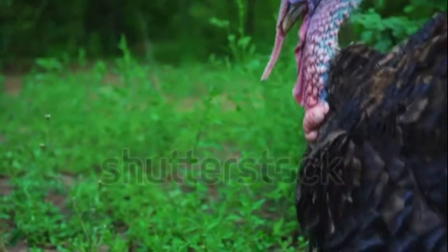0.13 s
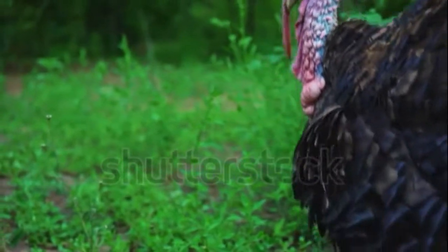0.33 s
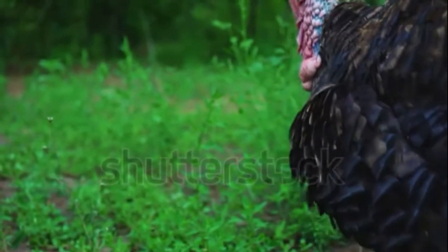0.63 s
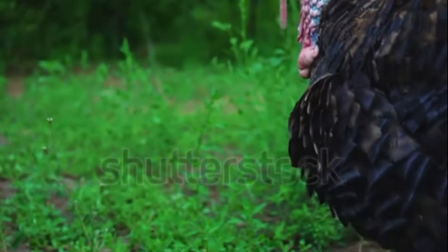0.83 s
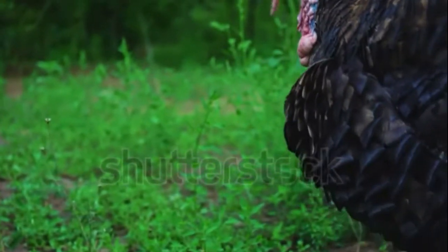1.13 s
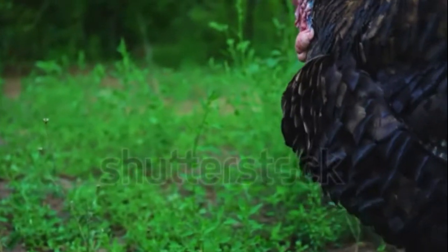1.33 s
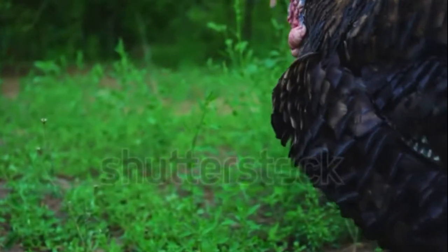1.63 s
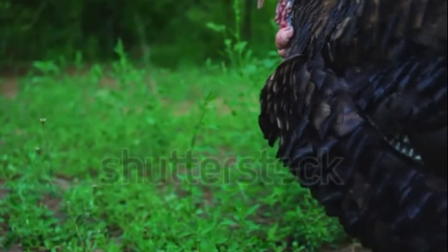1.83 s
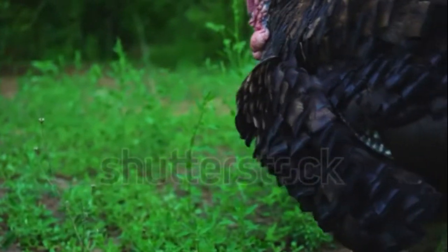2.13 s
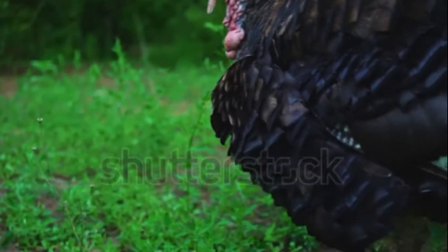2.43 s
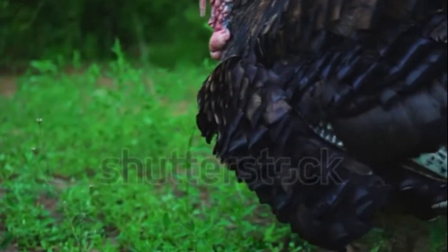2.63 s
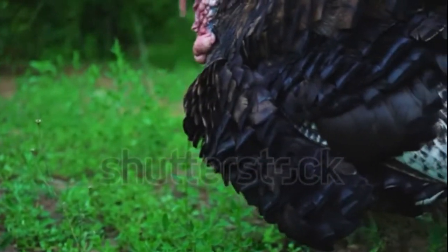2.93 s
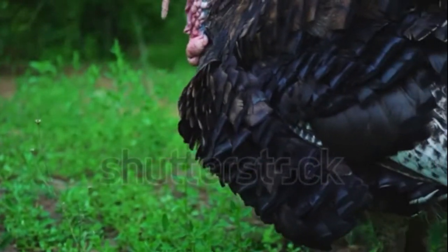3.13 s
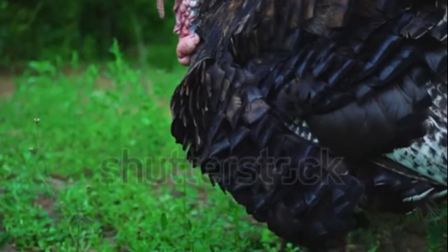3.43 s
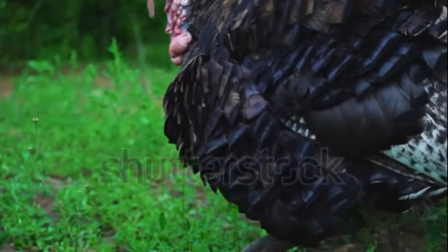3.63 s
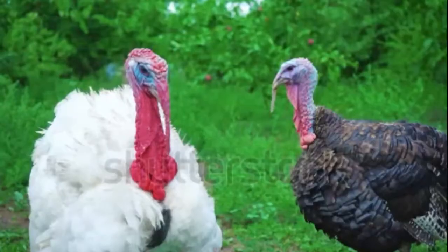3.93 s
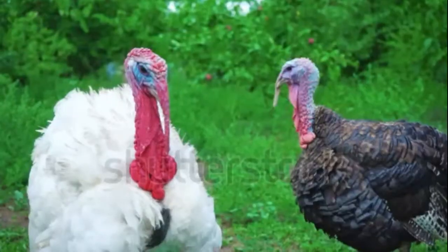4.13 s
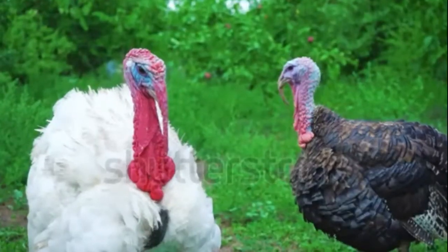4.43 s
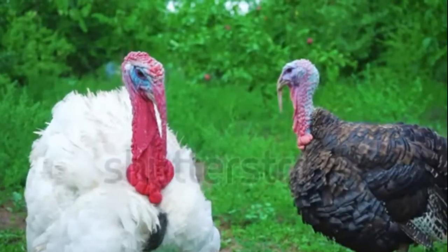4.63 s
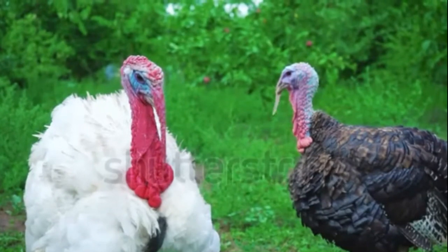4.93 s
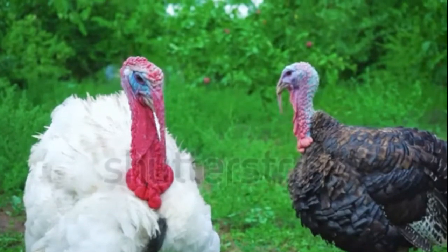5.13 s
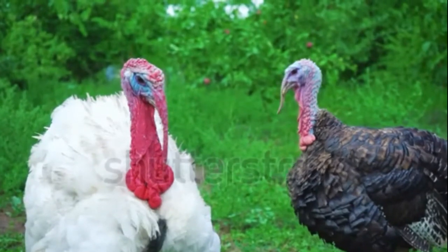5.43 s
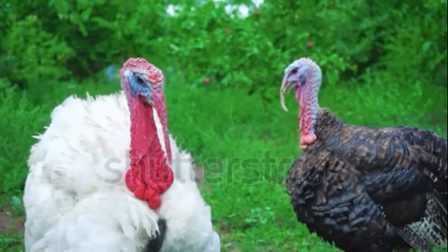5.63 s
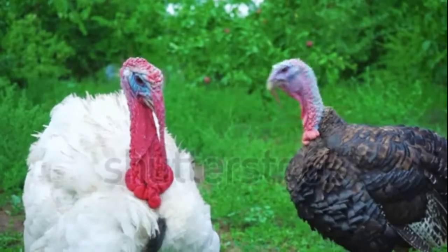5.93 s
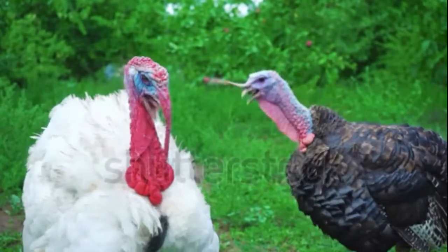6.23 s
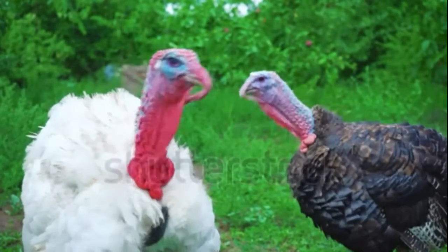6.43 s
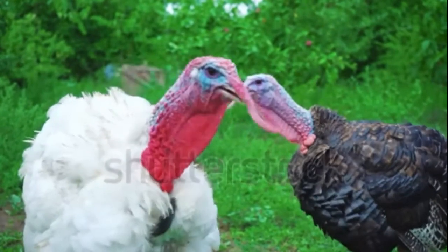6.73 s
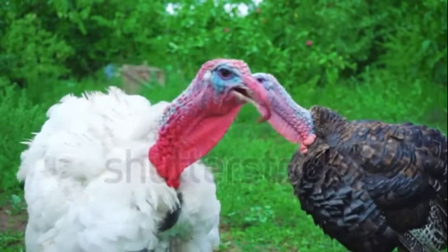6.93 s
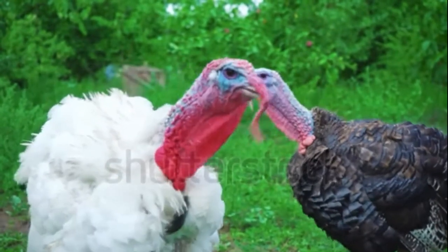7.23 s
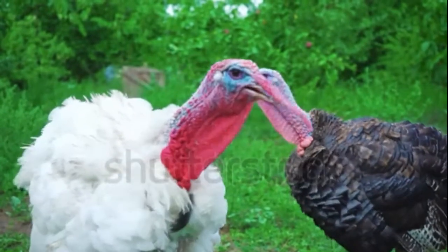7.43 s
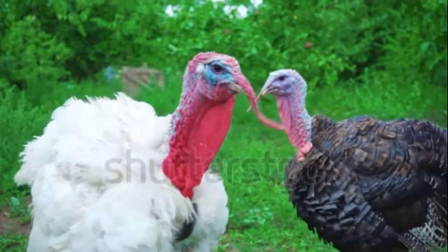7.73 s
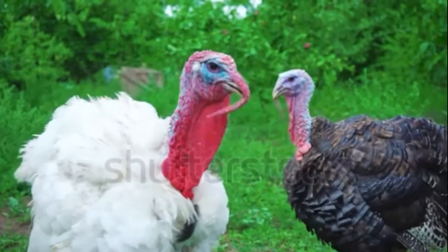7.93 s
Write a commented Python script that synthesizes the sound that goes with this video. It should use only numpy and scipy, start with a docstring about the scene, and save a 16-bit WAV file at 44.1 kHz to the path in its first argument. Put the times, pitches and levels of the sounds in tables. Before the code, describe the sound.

A few turkeys call close to a stereo microphone on a lawn. Hoarse squawks run into a quick string of yelps, then a bubbling gobble. Mixed chatter and wavering cries fill the middle, another gobble follows, then voices that crack upward, and two more gobbles near the end. Quiet clucks, occasional low chest drumming, soft air rumble and a very faint echo from trees lie underneath.

```python
"""On a lawn, a few turkeys call over one another close to a stereo microphone: gobbles, yelps, hoarse squawks
and low chatter over soft rumble, a deep chest drumming now and then, and a faint echo from trees.
Voices are harmonic stacks roughened by noise; a gobble is a held note, then pulses with whistles between.
Drumming is a wavering sine, the air is shaped noise, and the echo is decaying noise taps."""
import sys
import numpy as np
from scipy import signal
from scipy.io import wavfile
from scipy.ndimage import uniform_filter1d

SR = 44100
rng = np.random.default_rng(int(sys.argv[2]) if len(sys.argv) > 2 else 0)


def master_out(mix):
    """Clip the mix to full scale and print it as 16-bit PCM to the path in sys.argv[1]."""
    frames = np.transpose(np.atleast_2d(mix))
    ceiling = np.clip(frames, -1, 1)
    pcm = np.round(ceiling * 32767).astype(np.int16)
    wavfile.write(sys.argv[1], SR, pcm)


N = 356107


def amp(db):
    """Amplitude ratio of a level in dB."""
    return 10 ** (np.asarray(db) / 20)


def evened(x):
    """Scales each row to rms 1."""
    return x / np.sqrt(np.mean(abs(x) ** 2, -1, keepdims=True) + 1e-20)


def add(mix, start_s, sound):
    """Adds a stereo sound into the mix at its start time."""
    part = mix[:, max(round(start_s * SR), 0):][:, :sound.shape[1]]
    part += sound[:, :part.shape[1]]


def wander(count, size):
    """Smooth random drift of rms 1 that turns every `size` samples or so."""
    x = rng.standard_normal(count + 4 * size)
    smooth = uniform_filter1d(uniform_filter1d(x, size=size), size=size)
    return evened(smooth)[2 * size:2 * size + count]


# spectrum of the air noise: freq_hz, relative_db_per_hz
AIR_SPECTRUM = [(25, -15), (124, -11), (330, -17), (600, -23.5), (3000, -38), (11000, -40.5)]
AIR_DB = -51


def air():
    """Soft rumble and hiss: shaped noise in drifting patches, mostly unlike at the two ports."""
    frames, bin_hz = N // 256 + 5, np.fft.rfftfreq(1024, 1 / SR)
    a, b, c, d, patches = rng.standard_normal((frames, 513, 5)).T
    patches = uniform_filter1d(patches, size=6, axis=0)
    patches = evened(uniform_filter1d(patches, size=20, axis=1))
    shared, separate = a + 1j * b, c + 1j * d
    ports = np.array([shared, 0.38 * shared + 0.96 * separate])
    freq_hz, density_db = np.transpose(AIR_SPECTRUM)
    spectrum_db = np.interp(np.log(bin_hz + 1), np.log(freq_hz + 1), density_db)
    ports = ports * amp(spectrum_db[:, None] + 3 * patches)
    noise = signal.istft(ports, nperseg=1024, noverlap=768)[1][:, :N]
    return amp(AIR_DB) * evened(noise)


NEAR_DECAY_S, NEAR_DB = 0.066, -8  # time to fall 60 dB
FAR_DECAY_S, FAR_RISE_S, FAR_DB = 6.5, 0.066, -48  # tail is cut at 1 s


def space(x):
    """Ground and bodies give short reflections, unlike at each port; far trees a long, dull, faint tail."""
    t = np.arange(SR) / SR
    taps = rng.standard_normal((2, 2, SR))
    near = taps[0] * amp(-60 * t / NEAR_DECAY_S) * (t > .0004)
    far = uniform_filter1d(taps[1], size=8) * amp(-60 * t / FAR_DECAY_S) * np.clip(t / FAR_RISE_S, 0, 1)
    near *= amp(NEAR_DB) / np.linalg.norm(near[0])
    far *= amp(FAR_DB) / np.linalg.norm(far[0])
    return signal.fftconvolve(x.mean(0)[None], near + far, axes=1)[:, :N]


# chest drumming, one list a bout: time_s, level_db
DRUM_BOUTS = [
    [(1.1, -49.5), (1.75, -58.5)],
    [(2.7, -57), (3.48, -47), (3.9, -57)],
    [(5.63, -37.5), (5.77, -39)],
    [(6.8, -52), (7.1, -66)],
    [(7.75, -46), (8.07, -59)],
]
DRUM_HZ, DRUM_WAVER = 72.5, .06  # waver: rms share of pitch


def drumming():
    """Chest drumming: a low sine, wavering in pitch and level."""
    t = np.arange(N) / SR
    level = sum(amp(np.interp(t, *np.transpose(rows), -120, -120)) for rows in DRUM_BOUTS)
    level = uniform_filter1d(level, size=600) * amp(4 * wander(count=N, size=1800))
    turns = np.cumsum(DRUM_HZ * (1 + DRUM_WAVER * wander(count=N, size=2000))) / SR
    return np.sqrt(2) * level * np.sin(2 * np.pi * turns)


# bouts of farther clucks: start_s, end_s
FLOCK_BOUTS = [(1.15, 1.62), (2.9, 3.85), (7.3, 8.05)]
# farther voice: pan_db (left-right), hoarseness_0_1, second_db, third_db, upper_db (harmonics as VOICES)
FLOCK_VOICE = (-7, .16, 0, -10, -32)
FLOCK_DB, FLOCK_STEP_S = -46, .05  # quietest cluck


def flock():
    """Farther birds: short arched clucks, about one a step, with random timing, pitch and strength."""
    mix = np.zeros((2, N))
    for start, end in FLOCK_BOUTS:
        starts = np.arange(start, end, FLOCK_STEP_S)
        for s, (late, high, arch, loud) in zip(starts, rng.random((len(starts), 4))):
            t = np.arange(s, s + .04, 1 / SR) + late * FLOCK_STEP_S
            hump = np.sin(np.linspace(0, np.pi, len(t)))
            hz = 550 * 2 ** high * (1 + .3 * (arch - .5) * hump)
            add(mix, t[0], sing(t, amp(FLOCK_DB + 10 * loud) * hump, hz, FLOCK_VOICE))
    return mix


# throat shaking: first_crest_s, end_s, rate_hz, first_swing, last_swing (shares of pitch)
WARBLES = [(2.526, 2.768, 41, 0.046, 0.031), (4.729, 4.966, 42, 0.074, 0.024),
           (5.843, 6.05, 33, 0.05, 0.043)]


def shaking(t):
    """Throat shake as a relative pitch swing; zero outside the warbles."""
    swing = 0
    for start, end, rate_hz, first, last in WARBLES:
        depth = np.interp(t, [start - .02, start, end, end + 0.0099], [0, first, last, 0])
        swing = swing + depth * np.cos(2 * np.pi * rate_hz * (t - start))
    return swing


# every second cycle weakens: start_s, full_s, end_s, depth_0_1
DOUBLING = [(4.99, 5.03, 5.09, .92), (5.975, 6.0, 6.06, .6), (6.08, 6.09, 6.117, .7),
            (6.29, 6.3, 6.37, .06), (7.08, 7.09, 7.16, .05)]


def doubling(t):
    """Depth by which alternate vocal cycles differ in strength."""
    return sum(np.interp(t, [start, full, end, end + .001], [0, depth, depth, 0])
               for start, full, end, depth in DOUBLING)


# windpipe and beak favour some overtones: freq_hz, gain_db
RING = [(900, 0), (2000, 4), (2600, -3), (3250, 5), (3850, 2), (4600, 5), (5300, -9), (6100, -4),
        (7200, -1), (8200, -7), (9200, 1), (11000, -6)]


def sing(t, level, hz, voice, fade_s=0.0023):
    """Harmonic stack; hoarseness unsettles the pitch and swaps each harmonic for a noise band around it."""
    pan_db, hoarse, second_db, third_db, upper_db = voice
    shake = shaking(t)
    quaver = (.006 + .1 * min(hoarse, .4)) * wander(count=len(t), size=250)
    jitter = .22 * hoarse * wander(count=len(t), size=24)
    k = np.arange(1, 17)[:, None]
    steady_hz = hz * (1 + shake + quaver)

    # upper_db holds at 4 kHz, with a tilt per kHz
    shares_db = upper_db - 2.09 * (k * steady_hz / 1000 - 4.0)
    shares_db[:3] = [[0], [second_db], [third_db]]
    shares_db += np.interp(k * steady_hz, *np.transpose(RING))
    # softer singing is duller; overtones fade as a glide lifts them past the throat's ring
    softer_db = np.clip(20 * np.log10(level / level.max() + 1e-9), -20, 0)
    shares_db += np.sqrt(k - 1) * 0.16 * softer_db
    shares_db -= 2.3 * (k - 1) * (hz - hz.mean()) / 1000
    patchy = wander(count=len(k) * len(t), size=400).reshape(len(k), len(t))
    shares_db += 1.09 * np.minimum(k - 1, 5) * patchy
    shares = amp(shares_db) * (k * hz < SR / 3)

    # upper harmonics are always a little breathy
    rough = np.clip(hoarse + .011 * k * (k - 1), 0, 1)
    noise = rng.standard_normal((2, len(k), len(t)))
    a, b = uniform_filter1d(uniform_filter1d(noise, size=36), size=36)
    breath = evened(a + 1j * b)
    turns = np.cumsum(steady_hz * (1 + jitter)) / SR
    carrier = np.exp(1j * k * (2 * np.pi * turns + np.pi / 4))
    stack = shares * (np.sqrt(1 - rough ** 2) + rough * breath) * carrier
    wave = np.sqrt(2) * stack.real.sum(0) / np.sqrt((shares ** 2).sum(0))
    wave = wave * (1 + doubling(t) * np.cos(np.pi * turns))

    edges = np.sin(np.pi / 2 * np.clip(np.minimum(t - t[0], t[-1] - t) / fade_s, 0, 1)) ** 2
    thinning = amp(-40 * shake)  # quieter at the top of each shake
    return wave * edges * level * thinning * amp([[pan_db / 2], [-pan_db / 2]])


def phrase(rows, voice, size=180):
    """Sings along rows of time_s, level_db, pitch_hz; corners rounded over `size` samples."""
    s, level_db, hz = np.transpose(rows)
    t = np.arange(s[0], s[-1], 1 / SR)
    tracks = [np.interp(t, s, amp(level_db / 2)) ** 2, np.interp(t, s, hz)]
    level, hz = uniform_filter1d(tracks, size=size, mode="nearest")
    return s[0], sing(t, level, hz, voice)


# voice kinds, harmonics re the 1st before RING and drift: second_db, third_db, upper_db (at 4 kHz)
VOICES = {"yelp": (-21, -19, -30), "pipe": (-36, -45, -48), "clear": (1.5, -21, -30.5),
          "full": (2.9, -8.5, -27.5), "cluck": (2.2, -4, -25.5), "chatter": (0.84, -22, -29.5),
          "nasal": (18, 16, -10), "rasp": (5.34, -3, -15.5), "squawk": (13.6, 0.75, 0),
          "thin": (-22, -22, -31.5), "hiss": (-1.5, -10, 5.2), "honk": (14, 5.9, -25),
          "bright": (1, -16.5, -22), "plain": (-8.5, -22, -36)}
# hoarseness_0_1 of each kind
HOARSE = {"yelp": .02, "pipe": .04, "clear": .03, "full": .06, "cluck": .12, "chatter": .13, "nasal": .25,
          "rasp": .27, "squawk": .36, "thin": .3, "hiss": 1, "honk": .07, "bright": .04, "plain": .07}
RISE_DB, RELEASE_S, RELEASE_DB = -20, .003, -9


def note(start, length, attack, level_db, change_db, first_hz, middle_hz, last_hz, pan_db, voice):
    """Attack, sloping hold and release; the pitch bends smoothly through three values."""
    s = np.arange(0, length, .002)
    hold = max(length - RELEASE_S, attack + .001)
    shape_db = [RISE_DB, 0, change_db, change_db + RELEASE_DB]
    # straight in square-root amplitude
    shape = np.interp(s, [0, attack, hold, hold + RELEASE_S], amp(np.divide(shape_db, 2)))
    bend = np.polyfit([0, .5, 1], [first_hz, middle_hz, last_hz], deg=2)
    hz = np.polyval(bend, s / length)
    rows = np.transpose([start + s, level_db + 40 * np.log10(shape), hz])
    return phrase(rows, (pan_db, HOARSE[voice], *VOICES[voice]))


# single notes: start_s, length_s, attack_s, level_db, hold_change_db, first_hz, middle_hz, last_hz,
# pan_db (left-right), voice
NOTES = [ (0, 0.026, 0.0018, -21.5, -9.5, 2204, 1150, 597, 6.5, "thin"),
         (0.079, 0.073, 0.026, -22.5, -3, 937, 891, 946, -1.5, "cluck"),
         (0.109, 0.074, 0.0043, -17, 0.5, 948, 1011, 1080, -4, "squawk"),
         (0.171, 0.03, 0.016, -16.5, -6.5, 1095, 1743, 2600, -3.5, "thin"),
         (0.193, 0.035, 0.0052, -27, -10.5, 2550, 2190, 840, -3.5, "pipe"),
         (0.257, 0.058, 0.028, -13, -10, 838, 848, 764, 2, "clear"),
         (0.373, 0.041, 0.025, -27.5, 5, 864, 888, 840, 2.5, "full"),
         (0.387, 0.12, 0.012, -15, -4.5, 922, 1024, 985, -5, "squawk"),
         (0.48, 0.08, 0.028, -8.5, -5.5, 724, 789, 828, 4.5, "pipe"),
         (0.548, 0.05, 0.0027, -16, 3.5, 913, 800, 1060, -1, "yelp"),
         (0.621, 0.0334, 0.0079, -15, 0.5, 855, 956, 1104, 1.5, "yelp"),
         (0.671, 0.032, 0.016, -12, 0, 940, 956, 1110, 4.5, "yelp"),
         (0.724, 0.026, 0.0057, -11, 1, 947, 979, 1096, -1.5, "yelp"),
         (0.765, 0.038, 0.0092, -7.5, -8.5, 932, 1033, 1110, 4, "yelp"),
         (0.797, 0.042, 0.021, -8, -4, 997, 1009, 1115, 2, "yelp"),
         (0.837, 0.057, 0.0069, -11, 0.5, 1054, 993, 1045, 4, "yelp"),
         (0.909, 0.014, 0.006, -12, -14, 1035, 780, 631, -2, "pipe"),
         (1.089, 0.037, 0.022, -29, -18, 872, 960, 930, -5.5, "rasp"),
         (1.161, 0.021, 0.0075, -30.5, -21, 934, 880, 820, -1, "cluck"),
         (1.278, 0.046, 0.035, -17, 5, 534, 580, 676, -5, "honk"),
         (1.317, 0.064, 0.022, -14.5, -15.5, 589, 620, 713, -6.5, "honk"),
         (1.364, 0.043, 0.0051, -25, -9.5, 730, 600.6, 520, -3.5, "pipe"),
         (1.503, 0.12, 0.023, -24, -3, 711, 597, 742, -6, "chatter"),
         (2.045, 0.022, 0.019, -22.5, -19, 1890, 933, 610, -11, "pipe"),
         (2.288, 0.11, 0.1, -19.5, -17, 1263, 1412, 1283, -6.5, "yelp"),
         (2.361, 0.026, 0.0031, -33.5, 19.5, 1336, 1900, 2420, -2, "pipe"),
         (2.408, 0.053, 0.0052, -39.5, 14, 1386, 1355, 1260, -1, "pipe"),
         (2.409, 0.029, 0.0049, -31, 1, 2470, 1610, 903.2, -2, "pipe"),
         (2.452, 0.05, 0.018, -22, -5.5, 1030, 934, 880, -1, "clear"),
         (2.503, 0.051, 0.0044, -24.5, 10.5, 1207, 1248, 1164, 1.5, "yelp"),
         (2.504, 0.11, 0.009, -29.5, 4, 854, 803, 730, 0, "plain"),
         (2.516, 0.11, 0.025, -18, 2, 991, 996, 1054, 0, "squawk"),
         (2.617, 0.1574, 0.0077, -16.5, 2, 787, 822, 628, -0.5, "full"),
         (2.756, 0.029, 0.0077, -26, -1.5, 625, 527, 477, 6, "plain"),
         (2.771, 0.097, 0.0035, -17, 5, 901, 942, 983, 2, "rasp"),
         (2.782, 0.18, 0.037, -32, 5.5, 480.6, 707, 664, -9, "cluck"),
         (2.848, 0.084, 0.028, -14, 2, 905, 828, 678, 3, "cluck"),
         (2.937, 0.049, 0.016, -28, 13, 699, 676, 726, -8, "chatter"),
         (2.976, 0.02, 0.0091, -19.5, 10.5, 705, 843, 995, 2.5, "rasp"),
         (2.995, 0.033, 0.0075, -16.5, -1, 1890, 1803, 1440, -1.5, "thin"),
         (3.027, 0.023, 0.011, -11, -13, 1370, 1330, 1210, 4.5, "plain"),
         (3.047, 0.067, 0.0032, -15.5, 2.5, 845, 857, 586, 1.5, "cluck"),
         (3.115, 0.0385, 0.0044, -23.5, -4, 587, 560, 510, -12.5, "honk"),
         (3.148, 0.037, 0.013, -25.5, -16, 526, 571, 560, -12, "chatter"),
         (3.182, 0.063, 0.015, -25.5, -6, 640, 709, 703, -12, "chatter"),
         (3.204, 0.018, 0.015, -18.5, 5, 950, 970, 1020, -7, "plain"),
         (3.226, 0.038, 0.0038, -29, 3.5, 718, 587, 584, -7, "chatter"),
         (3.277, 0.021, 0.0092, -23, -2, 1100, 1110, 1090, -8, "pipe"),
         (3.294, 0.073, 0.017, -21, -6.5, 571, 665, 610, -11, "bright"),
         (3.327, 0.039, 0.013, -22.5, 5, 1028, 1050, 1090, -10.5, "pipe"),
         (3.368, 0.09, 0.006, -28.5, -3, 590, 669, 550, -9.5, "chatter"),
         (3.46, 0.076, 0.029, -28, -12, 910, 1038, 1120, -4.5, "thin"),
         (3.53, 0.034, 0.016, -26, -3.5, 1196, 1066, 890, -4, "pipe"),
         (3.569, 0.054, 0.037, -25.5, -6.5, 602, 575, 690, -3.5, "nasal"),
         (3.616, 0.078, 0.03, -32.5, 4.5, 561, 670, 488, 0, "chatter"),
         (3.66, 0.022, 0.013, -22, -2, 906, 948, 1030, -1, "clear"),
         (3.742, 0.023, 0.016, -26, -9, 630, 591, 496, 0.5, "thin"),
         (3.797, 0.049, 0.013, -27, -7, 684.5, 593, 605, 1.5, "thin"),
         (3.839, 0.032, 0.0071, -27.5, -0.5, 665, 560, 540, 4, "plain"),
         (4.059, 0.028, 0.011, -31, 1.5, 655, 610, 557, 4.5, "plain"),
         (4.279, 0.026, 0.0039, -15, -3.5, 2080, 1437, 514, 3.5, "pipe"),
         (4.427, 0.047, 0.013, -32, -29, 826, 1120, 1180, -2, "plain"),
         (4.618, 0.036, 0.025, -10, -17, 976, 897, 1074, 6.5, "clear"),
         (4.652, 0.038, 0.0086, -20, -30, 1480, 1350, 1130, 6, "yelp"),
         (4.692, 0.32, 0.01, -22, 10.5, 963, 854, 782, 6, "full"),
         (4.999, 0.08, 0.0075, -15.5, -1.5, 782, 622, 566, 6, "full"),
         (5.278, .03, 0.019, -28, -3, 1110, 1200, 1260, 7, "squawk"),
         (5.624, 0.052, 0.0072, -38, -44, 800, 922, 957, -3.5, "hiss"),
         (5.688, 0.054, 0.011, -45.5, 1.5, 914, 918, 895, -1.5, "hiss"),
         (5.752, .078, 0.0066, -40, 4, 743, 1280, 992, 8, "plain"),
         (5.827, .095, 0.0077, -32.5, 0, 907, 832, 820, 4, "plain"),
         (5.919, 0.074, 0.018, -37, 11, 850, 784, 756, 4, "clear"),
         (5.987, 0.068, 0.0085, -28, -3.5, 708, 665, 634, 5.5, "full"),
         (6.084, .033, .008, -22, -8.5, 640, 680, 720, 4.5, "cluck"),
         (6.114, 0.044, 0.0055, -22.5, -1.5, 860, 725, 556, 5, "cluck"),
         (6.21, 0.018, 0.014, -9, -30, 623, 733, 1080, 5.5, "cluck"),
         (6.226, 0.046, 0.0038, -19.5, -0.5, 1600, 1965, 1510, 3.5, "pipe"),
         (6.263, 0.054, 0.056, -18, 11, 1302, 1220, 1090, 9, "plain"),
         (6.719, 0.013, 0.0074, -11.5, 0, 1440, 1627, 1070, -9, "pipe"),
         (6.728, 0.022, 0.0035, -18.5, -6, 1030, 783, 550, -4, "plain"),
         (6.855, 0.056, 0.011, -29, -14.5, 990, 953, 770, -6.5, "rasp"),
         (6.961, 0.11, 0.044, -23, -12.5, 695, 575, 552.3, -5, "cluck"),
         (7.247, 0.033, 0.011, -20.5, -14, 536, 612, 577, -12, "cluck"),
         (7.315, 0.034, 0.018, -18, 1, 1005, 754, 555, 0, "rasp"),
         (7.569, 0.031, 0.0029, -22, -6, 2670, 1400, 660, -6, "pipe"),
         (7.599, 0.13, 0.022, -24, -43.5, 530, 569, 540, -8.5, "bright"),
         (7.725, 0.032, 0.004, -29.5, -33, 535, 614, 610, -8, "cluck"),
         (7.771, 0.014, 0.017, -16.5, -16, 620, 572, 545, -10, "honk"),
         (7.804, 0.015, 0.0066, -23.5, 1, 1140, 1092, 1080, -9, "pipe"),
         (7.822, 0.039, 0.019, -18.5, -1, 905, 983, 977, 2, "cluck"),
         (7.857, 0.041, 0.0045, -27, 5, 974, 918, 1024, 1, "full"),
         (7.87, 0.083, 0.0048, -29.5, 0.5, 614, 857, 1037, 4, "chatter"),
         (7.902, 0.046, 0.009, -34.5, 4, 1350, 1284, 1160, 10, "plain"),
         (7.939, 0.067, 0.027, -18, 1, 604, 636, 690, 4, "cluck"),
         (8.002, 0.056, 0.0062, -34.5, 10, 1223, 1108, 1260, 11, "plain"),
         (8.048, 0.027, 0.014, -21, -4, 1163, 1090, 1280, 4, "plain"), ]


def single_notes():
    """Yelps, squawks and chatter, one sung note each."""
    mix = np.zeros((2, N))
    for row in NOTES:
        add(mix, *note(*row))
    return mix


# calls that snap up a register and step back down, one list a call: time_s, level_db, pitch_hz
BREAKS = [
    [(5.106, -23, 640), (5.12, -12.5, 926), (5.134, -16.5, 1030), (5.136, -14, 1530), (5.148, -17, 1518),
     (5.155, -23, 1320), (5.157, -13, 966), (5.17, -11.5, 963), (5.182, -22, 850), (5.196, -11.5, 930),
     (5.212, -16, 790), (5.236, -16.5, 750), (5.252, -23, 586)],
    [(5.292, -17, 580), (5.3, -17, 783), (5.314, -11.5, 1070), (5.316, -14, 1960), (5.326, -21, 2053),
     (5.343, -20, 1750), (5.345, -14.5, 1444), (5.363, -20, 1365), (5.365, -12.5, 986),
     (5.383, -16.5, 1100), (5.393, -13, 894), (5.43, -13.5, 894), (5.447, -17.5, 737), (5.463, -40, 605)],
]
# their voice, columns as FLOCK_VOICE
BREAK_VOICE = (6.5, .05, -2, -7, -20.5)


def breaking_calls():
    """Calls whose pitch jumps between registers; corners stay sharp."""
    mix = np.zeros((2, N))
    for rows in BREAKS:
        add(mix, *phrase(rows, BREAK_VOICE, size=50))
    return mix


# cracks between the pulses of the first yelp: start_s, level_db
CRACKS = [(0.602, -28), (0.654, -26.5), (0.705, -21.5), (0.749, -25)]
# course of a crack: after_start_s, relative_db, pitch_hz
CRACK_SHAPE = [(0, 1, 1623), (.014, -0.5, 1485), (.025, -27, 980)]
# its voice, columns as FLOCK_VOICE
CRACK_VOICE = (1, .03, -14, -30, -45)


def cracks():
    """The voice cracks upward and slides back down."""
    mix = np.zeros((2, N))
    for s, level_db in CRACKS:
        add(mix, *phrase(np.add(CRACK_SHAPE, [s, level_db, 0]), CRACK_VOICE))
    return mix


# throat resonance, where the whistle is loudest: centre_hz, width_hz
THROAT = (1673, 850)
# whistle voice, columns as FLOCK_VOICE
WHISTLE_VOICE = (0.5, 0.1, -36, -45, -55)
WHISTLE_TOP_HZ = 2830


def whistle(s, length, rise_db, fall_db, from_hz, to_hz):
    """Between pulses the voice breaks into a thin tone that arcs up to its top and back."""
    t = np.arange(s, s + length, 1 / SR)
    u = (t - s) / length
    low_hz = from_hz + (to_hz - from_hz) * u
    hz = low_hz + (WHISTLE_TOP_HZ - low_hz) * abs(np.sin(np.pi * u ** 0.694))
    centre_hz, width_hz = THROAT
    throat_db = -10 * np.log10(1 + (2 * (hz - centre_hz) / width_hz) ** 4)
    level = amp(np.interp(u, [.3, .6], [rise_db, fall_db]) + throat_db)
    return s, sing(t, level, hz, WHISTLE_VOICE, fade_s=.0025)


def pulse(start, end, level_db, first_hz, last_hz, voice):
    """A full-voiced pulse: swells, holds, and flicks up in pitch as it is cut off."""
    t = np.arange(start - .002, end + 0.00019, 1 / SR)
    flick = np.exp((t - end) / 0.0028)
    hz = np.interp(t, [start, end], [first_hz, last_hz]) * (1 + 0.34 * flick)
    swell_db = -18 * np.exp(-(t - t[0]) / 0.0053)
    return t[0], sing(t, amp(level_db + swell_db), hz, voice)


# held notes that open the gobbles: start_s, end_s, first_hz, last_hz, level_db, pan_db (left-right),
# third_db, upper_db (harmonics as VOICES)
HOLDS = [(1.626, 1.768, 928.3, 816, -12.5, -1, -25, -25.5), (3.847, 3.997, 935, 827, -12, 1, -18.5, -29),
         (6.297, 6.441, 953, 854, -13, 0.35, -11, -24), (7.085, 7.231, 931, 860, -14, -1.8, -10.5, -20)]
# pulses that follow in the same voice, each with the whistle after it:
# start_s, end_s, pitch_hz, whistle_rise_db, whistle_fall_db
PULSES = [(1.786, 1.824, 846, -37, -15), (1.846, 1.881, 826, -28, -15.5), (1.901, 1.938, 848, -29, -20),
          (1.954, 1.984, 835, -20, -26), (2.007, 2.033, 830, -30, -14.5), (4.03, 4.056, 839, -38.5, -62),
          (4.082, 4.115, 843, -38, -13), (4.135, 4.168, 848, -17, -15.5), (4.191, 4.22, 834, -18, -15),
          (4.245, 4.271, 837, -16.5, -21), (6.473, 6.502, 853, -33.5, -15), (6.525, 6.562, 863, -13, -14.5),
          (6.583, 6.613, 863, -21.5, -16), (6.638, 6.664, 865, -12.5, -12.5),
          (6.689, 6.717, 790.2, -19, -45), (7.26, 7.294, 840, -35, -18.5), (7.319, 7.343, 738.5, -55, -31),
          (7.371, 7.401, 828, -20, -15.5), (7.421, 7.451, 820, -10, -17.5), (7.474, 7.512, 866, -8, -25),
          (7.525, 7.559, 872, -10.5, -23)]
SECOND_DB, PULSE_RISE = 3, 0.028  # 2nd harmonic; glide either side of pitch, as a share
HOLD_WHISTLE_DB = (-40.5, -58)  # rising, falling
WHISTLE_MAX_S, WHISTLE_FROM = 0.025, 1.247  # start, as a multiple of the last pulse pitch


def gobbles():
    """Each held note with the pulses that follow it; a whistle leaves the end of each."""
    mix = np.zeros((2, N))
    for start, end, first_hz, last_hz, level_db, pan_db, third_db, upper_db in HOLDS:
        voice = (pan_db, 0, SECOND_DB, third_db, upper_db)
        rows = [(start, end, first_hz, last_hz, *HOLD_WHISTLE_DB)]
        for a, b, hz, *whistle_db in PULSES:
            if 0 < a - end < .5:
                rows.append((a, b, hz * (1 - PULSE_RISE), hz * (1 + PULSE_RISE), *whistle_db))
        next_starts = [row[0] for row in rows[1:]] + [N]
        for (a, b, first, last, rise_db, fall_db), next_s in zip(rows, next_starts):
            add(mix, *pulse(a, b, level_db, first, last, voice))
            length = min(next_s - b + 0.0017, WHISTLE_MAX_S)
            add(mix, *whistle(b - .0005, length, rise_db, fall_db, WHISTLE_FROM * last, last))
    return mix


def turkeys():
    """All near voices, with the bass below about 330 Hz taken away by a high-pass."""
    mix = gobbles() + single_notes() + breaking_calls() + cracks()
    return signal.sosfilt(signal.butter(4, 330, "high", fs=SR, output="sos"), mix)


def scene():
    """Birds, their echo, drumming and air."""
    birds = turkeys() + flock()
    return air() + space(birds) + drumming() + birds


EDGE_HZ = 11200


def record(dry):
    """Rounds off the loudest peaks, then limits the band."""
    dry = dry / (1 + dry ** 4) ** .25
    lowpass = signal.firwin(255, EDGE_HZ, window=("kaiser", 9), fs=SR)
    return signal.oaconvolve(dry, lowpass[None], "same")


dry = scene()
out = record(dry)
master_out(out)
```